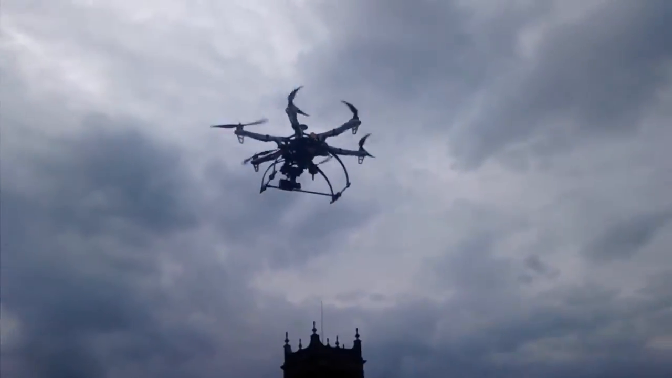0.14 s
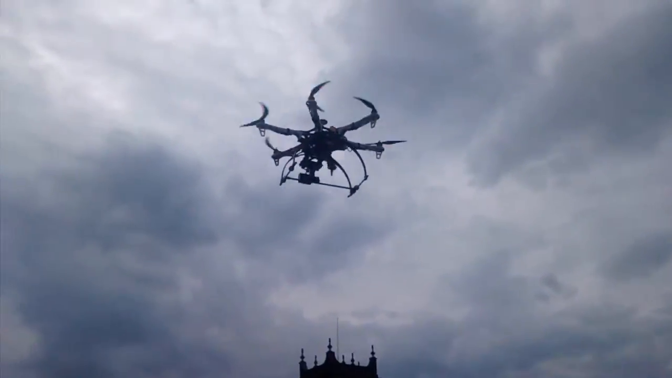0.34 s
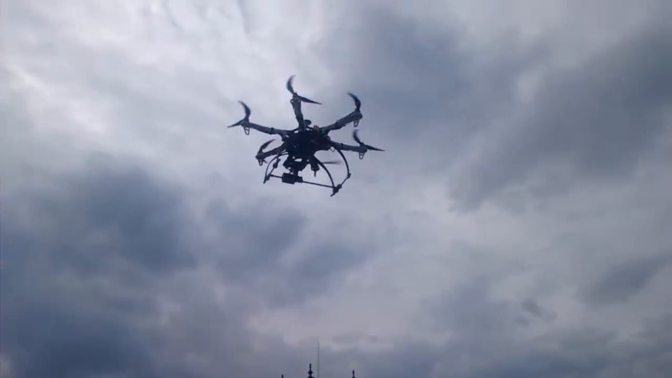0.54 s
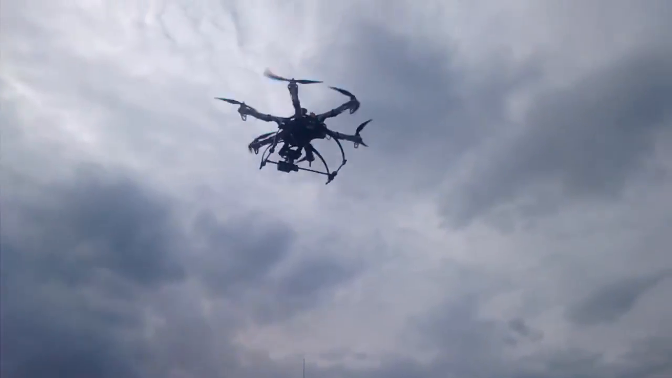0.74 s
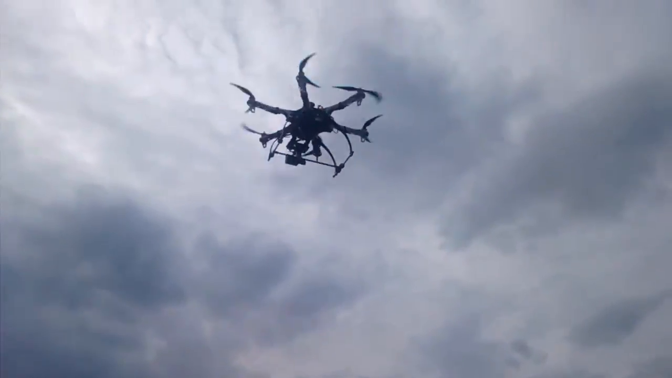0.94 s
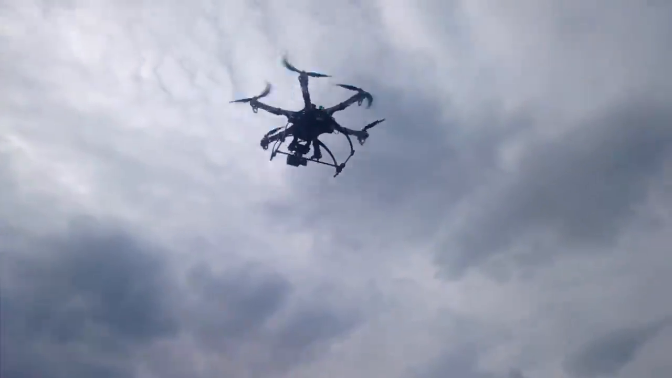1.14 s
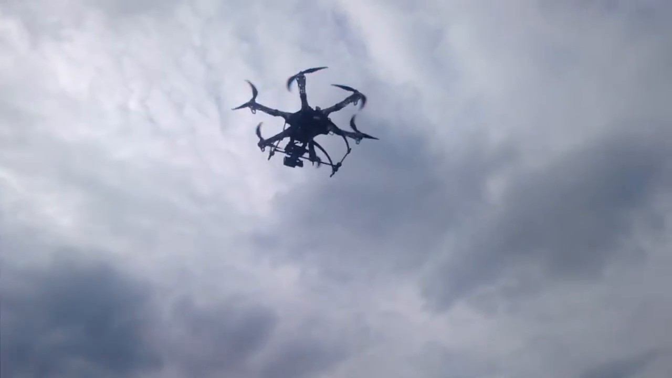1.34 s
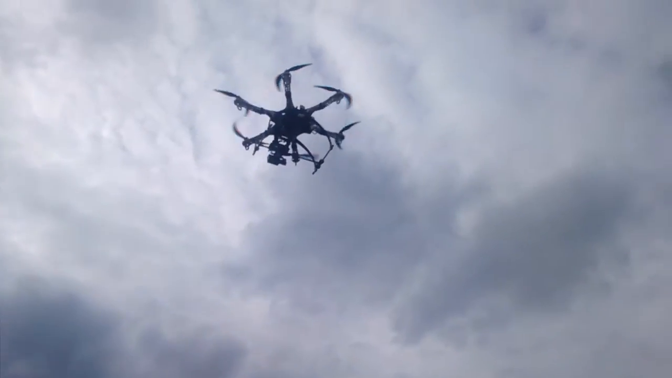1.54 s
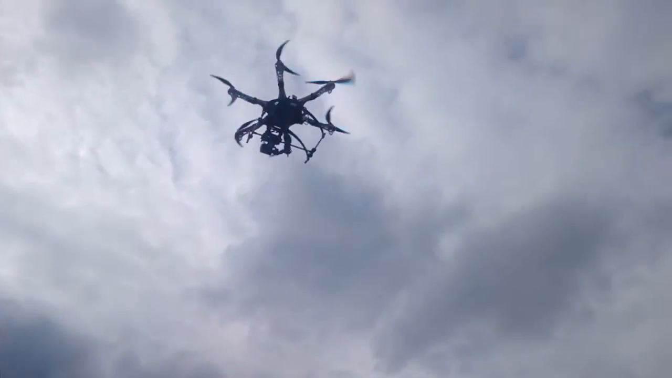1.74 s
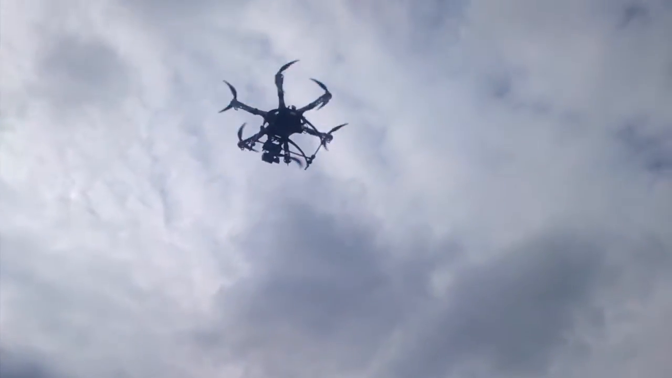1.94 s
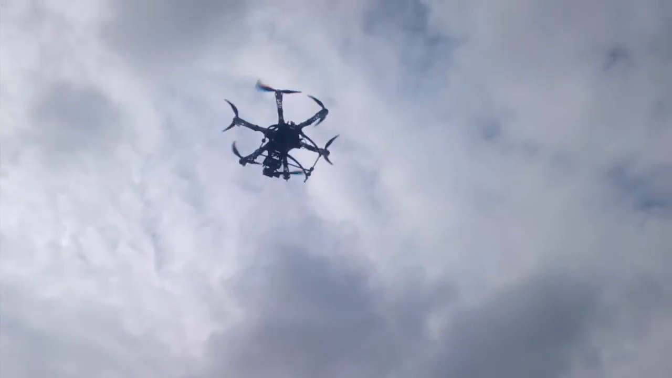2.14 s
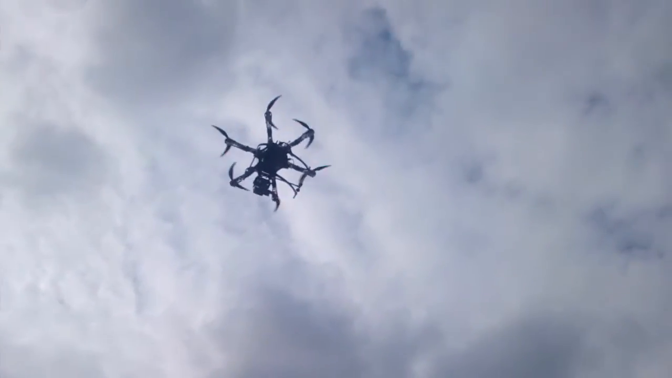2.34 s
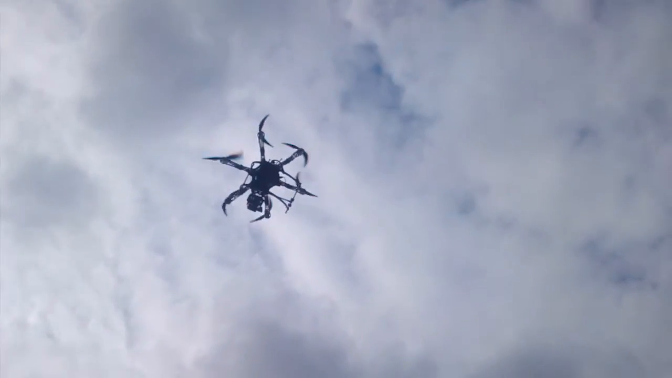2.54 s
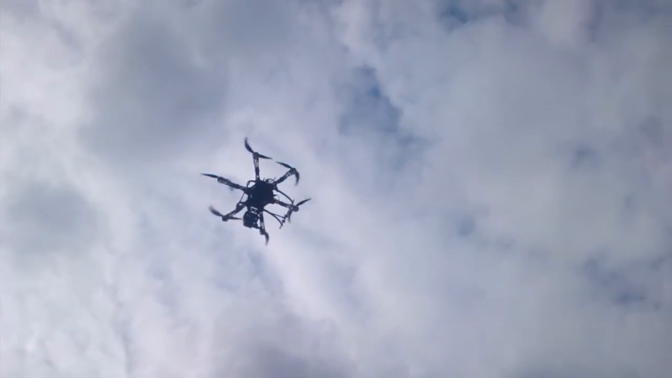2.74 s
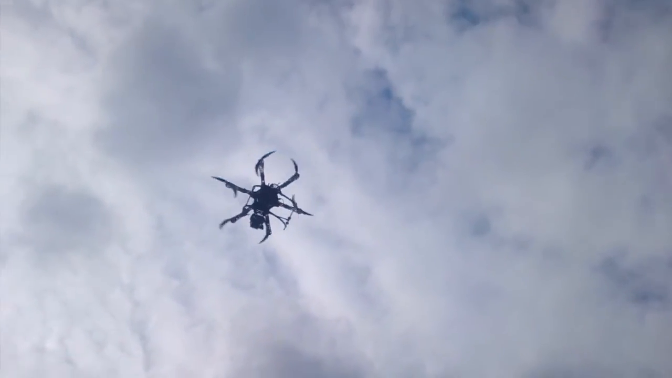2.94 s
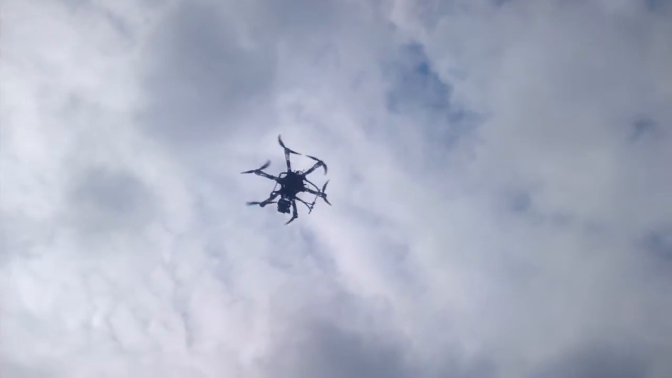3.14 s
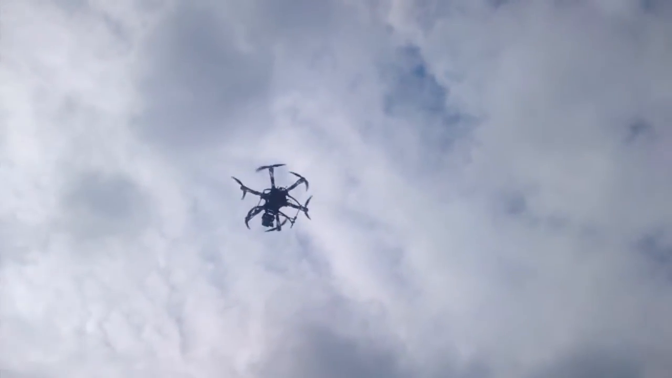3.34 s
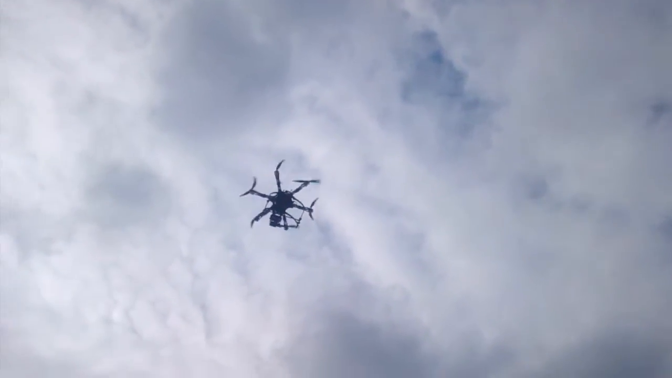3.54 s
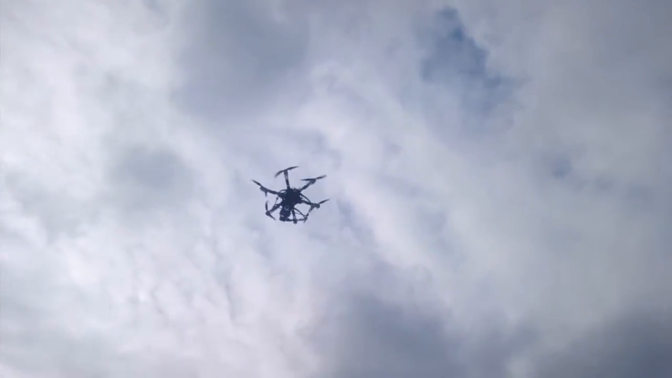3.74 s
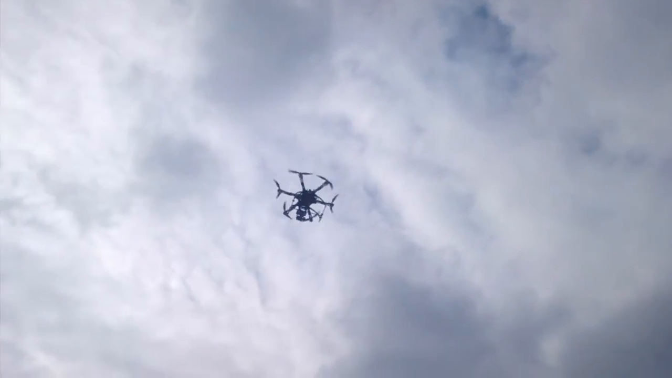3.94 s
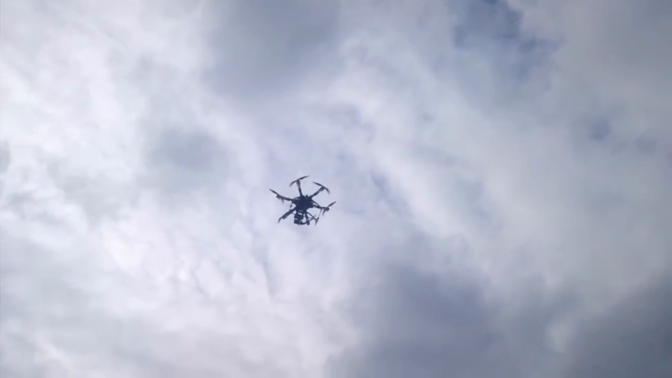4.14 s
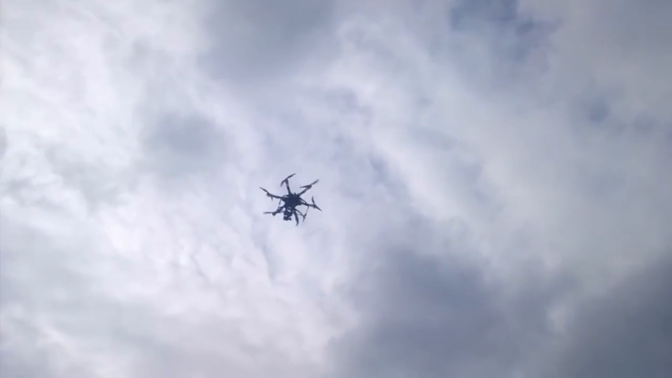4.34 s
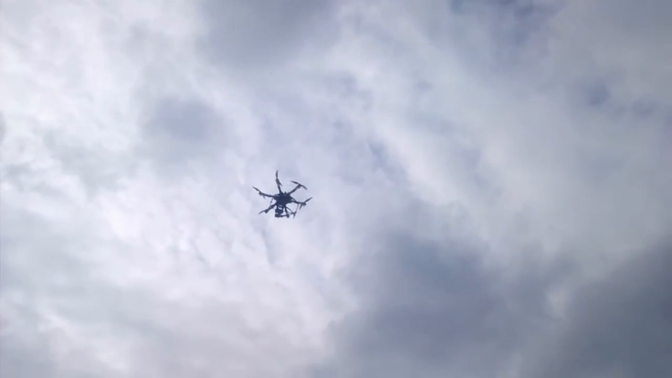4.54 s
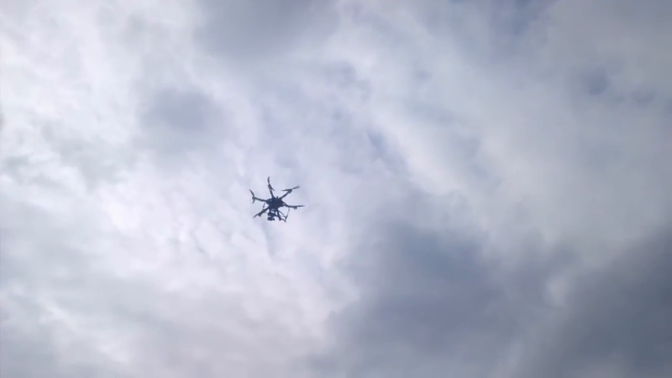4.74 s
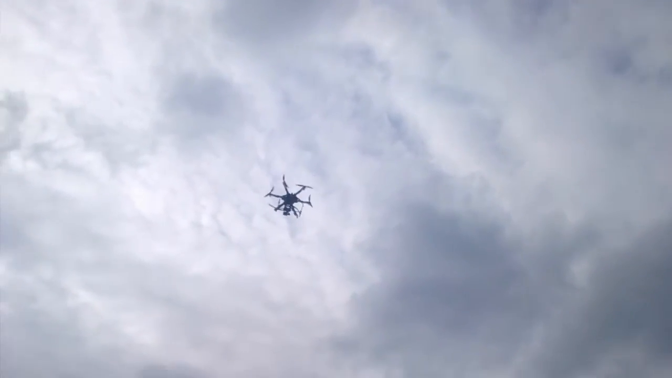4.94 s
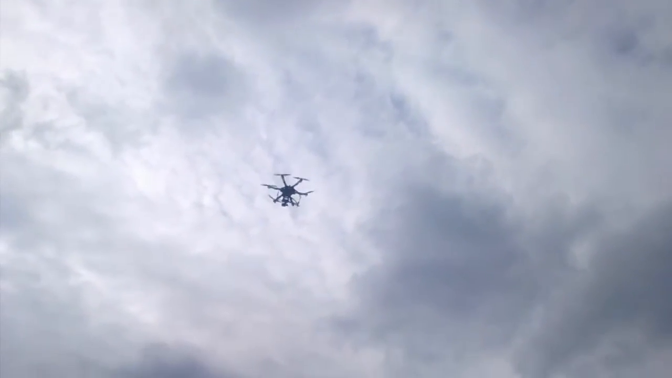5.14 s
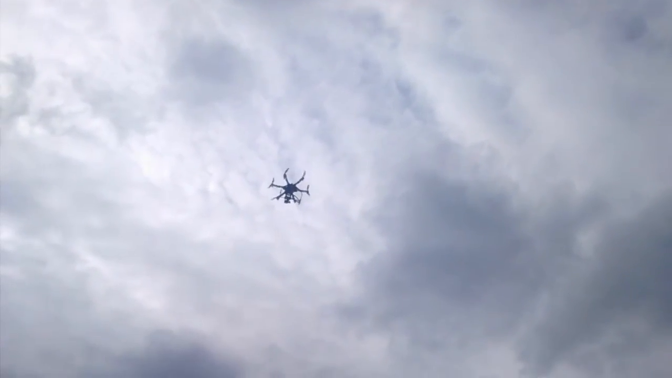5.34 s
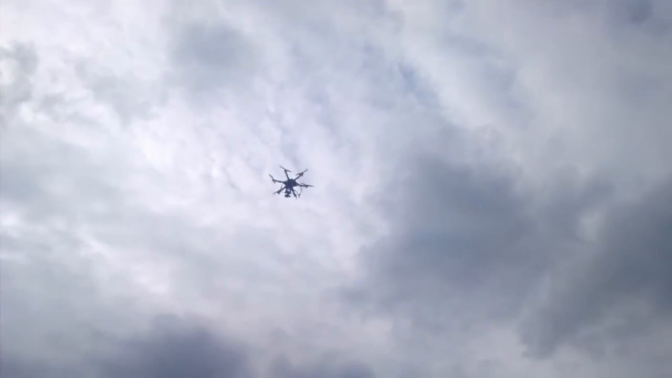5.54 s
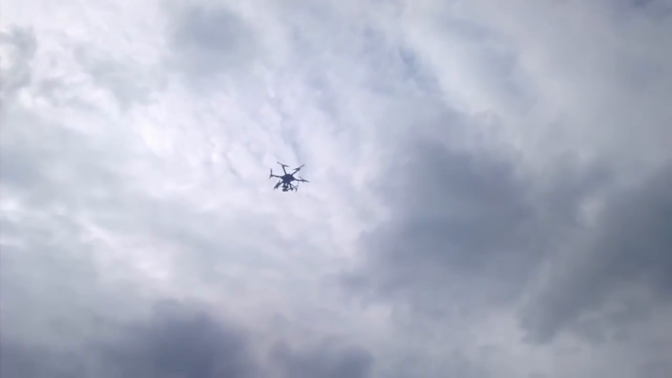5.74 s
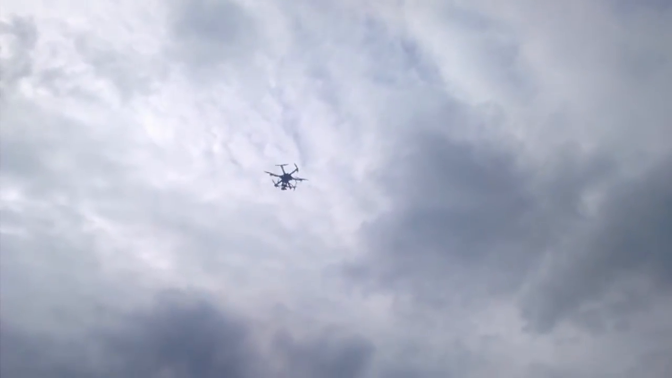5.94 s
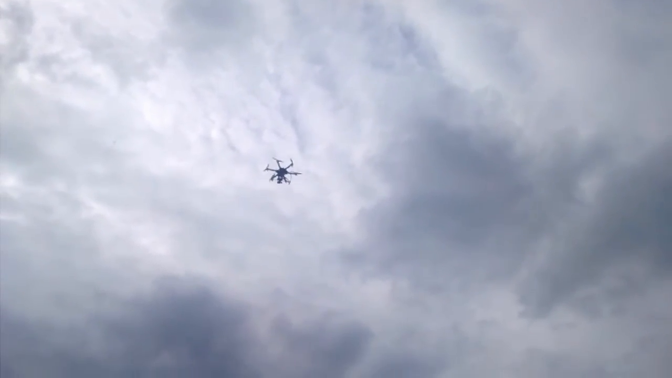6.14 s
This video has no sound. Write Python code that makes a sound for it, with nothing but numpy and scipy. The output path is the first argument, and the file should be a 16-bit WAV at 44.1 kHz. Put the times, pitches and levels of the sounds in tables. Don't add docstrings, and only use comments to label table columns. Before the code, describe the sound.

Loud electric rotors whir overhead from the start, slightly detuned against each other so the low hum throbs and wavers beneath a bright gritty hiss. A faint piercing motor whistle sits on top, and the recorder's case gets a soft tap. Past three seconds the craft recedes, swelling briefly near four, then becoming a thin distant buzz under wind bumps and faint town rumble. Open air, wide handheld stereo pickup.

```python
import sys
import numpy as np
from scipy import signal
from scipy.fft import rfft, irfft, next_fast_len
from scipy.io import wavfile
from scipy.ndimage import uniform_filter1d

SR = 44100
rng = np.random.default_rng(int(sys.argv[2]) if len(sys.argv) > 2 else 0)


def voltage_ratio(level):
    return 10 ** (np.asarray(level, float) / 20)


def store_wav(level_fs):
    pcm = np.round(np.clip(np.atleast_2d(level_fs), -1, 1) * 32767)
    wavfile.write(sys.argv[1], SR, pcm.T.astype(np.int16))


N = 277328
STEP = 40
PADDED = next_fast_len(N + 8192)
HZ = np.maximum(np.arange(PADDED // 2 + 1) * SR / PADDED, 1)


def rms_one(x):
    return x / np.sqrt(np.mean(x ** 2) + 1e-20)


def in_time(rows):
    s, *columns = np.transpose(rows)
    return np.array([np.interp(np.arange(N) / SR, s, c) for c in columns])


def fine(coarse):
    return np.array([np.interp(np.arange(N) / STEP, np.arange(len(v)), v) for v in coarse])


def slow_chance(rate, count=1):
    r = np.exp(-2 * np.pi * STEP * rate / SR)
    warm_up = 2000
    noise = rng.standard_normal((count, len(range(0, N, STEP)) + warm_up))
    slow = signal.lfilter([1], [1, -2 * r, r * r], noise)[:, warm_up:]
    return slow / np.sqrt(np.mean(slow ** 2, axis=1, keepdims=True))


def drift(rate, count=1):
    return fine(slow_chance(rate, count=count))


def bumps(rows, width_s):
    t = np.arange(N) / SR
    return sum(db * np.exp(-.5 * ((t - s) / width_s) ** 2) for s, db in rows)


def colour(points, axis=1):
    table = np.array(points)
    db = np.interp(np.log(HZ), np.log(table[:, 0]), table[:, axis])
    cepstrum = irfft(np.log(voltage_ratio(db)), PADDED)
    cepstrum[1:PADDED // 2] *= 2
    cepstrum[PADDED // 2 + 1:] = 0
    return np.exp(rfft(cepstrum))


def through(x, response):
    return irfft(rfft(x, PADDED) * response, PADDED)[..., :N]


def passing(x, order, hz, kind="low"):
    return signal.sosfilt(signal.butter(order, hz, kind, fs=SR, output="sos"), x)


def town_and_wind(lone_db):
    # f/Hz, right level/dB per Hz, left-only level/dB per Hz
    floor_spectrum = [(25, -65.5, -72), (56, -54.5, -77.5), (121, -70, -93.5), (284, -77, -88.5),
                      (750, -78, -79), (1530, -95, -86), (1750, -82.5, -98.5), (4160, -81, -91),
                      (6800, -83, -89), (10700, -102, -100), (14900, -105, -104)]
    # t/s, rise/dB
    gusts = [(0, 6), (.25, 1), (.75, 1), (1.05, 2), (1.42, 4), (1.85, 4), (3.65, 4), (3.83, 6), (4.1, 1),
             (4.62, 5), (5.08, 5.5), (5.35, 3), (6, 8.5), (6.27, 5)]
    wind_db = -42 + bumps(gusts, .07)
    responses = np.array([colour(floor_spectrum), colour(floor_spectrum, axis=2)])
    floor = np.sqrt(SR / 2) * through(rng.standard_normal((2, N)), responses)
    bass = passing(floor, 2, 130)
    floor += bass * (voltage_ratio(wind_db + 41 + 0.89 * drift(4.4)) - 1)
    floor[1] += passing(floor[1], 2, 250) * (voltage_ratio(lone_db) - 1)
    return floor


def recorder_tap():
    # t/s, peak level/dB
    taps = [
        (1.26, -15),
    ]
    out = np.zeros(N)
    after = np.arange(600) / SR
    for s, db in taps:
        out[round(s * SR):][:600] += voltage_ratio(db) * np.exp(-after / 0.0012) * np.sin(2 * np.pi * 420 * after)
    return out


def rotor_turns():
    # t/s, f/Hz
    slow_trio = [
        [(0.0, 175.0), (0.3, 175.0), (0.7, 176.2), (1.0, 178.7), (1.2, 182.5), (1.55, 179.4), (1.8, 183.2),
         (2.0, 182.3), (2.17, 184.5), (2.5, 178.2), (2.75, 179.5), (3.12, 182.9), (3.3, 186.1), (3.6, 182.9),
         (3.95, 179.4), (4.15, 176.2), (4.75, 180.0), (6.3, 180.0)],
        [(0.0, 179.0), (0.35, 183.3), (0.5, 182.5), (0.82, 185.6), (1.0, 189.1), (1.25, 186.6), (1.55, 185.4),
         (1.8, 188.3), (1.95, 191.7), (2.15, 187.1), (2.27, 183.6), (2.45, 186.8), (2.85, 186.2), (3.15, 184.5),
         (3.7, 186.3), (4.5, 186.9), (5.1, 191.0), (6.3, 189.0)],
        [(0.0, 179.7), (0.6, 184.1), (1.35, 187.3), (1.55, 185.1), (2.0, 192.0), (2.2, 187.3), (2.37, 189.0),
         (2.6, 186.2), (2.9, 186.1), (3.2, 189.2), (3.4, 185.8), (4.15, 190.0), (4.5, 186.4), (5.05, 192.5),
         (5.4, 190.5), (5.6, 191.5), (5.9, 188.0), (6.3, 190.0)],
    ]
    # t/s, f/Hz
    fast_trio = [
        [(0.0, 202.9), (0.6, 206.0), (0.95, 202.3), (1.2, 201.7), (1.32, 204.2), (1.6, 202.4), (1.8, 200.1),
         (1.9, 202.0), (2.0, 198.8), (2.13, 199.6), (2.27, 196.5), (2.4, 198.3), (2.55, 195.5), (2.87, 200.3),
         (3.15, 198.3), (3.3, 200.1), (3.42, 200.7), (3.5, 200.1), (3.6, 201.0), (3.8, 202.0), (3.92, 203.9),
         (4.12, 207.9), (4.4, 204.0), (5.05, 200.0), (5.95, 209.0), (6.3, 205.0)],
        [(0.0, 195.4), (0.3, 199.8), (0.45, 198.8), (0.6, 200.0), (0.8, 197.7), (1.2, 211.6), (1.55, 208.7),
         (1.7, 210.5), (2.05, 204.6), (2.15, 209.7), (2.45, 200.3), (2.6, 203.3), (2.8, 203.2), (2.9, 205.3),
         (3.0, 206.1), (3.2, 208.6), (3.3, 208.3), (3.6, 201.8), (4.3, 204.2), (4.8, 205.0), (5.3, 201.0),
         (6.3, 206.0)],
        [(0.0, 201.1), (0.35, 208.3), (0.6, 207.6), (0.85, 208.2), (1.12, 214.4), (1.35, 212.9), (1.7, 214.0),
         (1.95, 211.3), (2.45, 203.8), (3.25, 207.9), (3.9, 215.2), (4.6, 215.0), (4.95, 219.0), (5.05, 222.0),
         (5.35, 215.0), (5.7, 220.0), (5.9, 218.0), (6.2, 225.0), (6.3, 224.0)],
    ]
    speed = np.vstack([in_time(rows) for rows in slow_trio + fast_trio])
    far = np.clip(np.arange(N) / SR - 3.8, 0, 1)
    speed += (0.25 + 0.5 * far) * drift(12.44, count=6)
    return np.cumsum(speed, axis=1) / SR


def swelling(near_db):
    # t/s, rise/dB
    swells = [
        (4.11, 8.5),
        (4.25, 3.5),
        (4.35, 4.5),
        (5.12, 1.5),
    ]
    return near_db + bumps(swells, 0.034) + 0.46 * drift(4.6)[0]


def slap_strength():
    # t/s, level/dB of each of the 6 rotors
    slap_levels = [(0.0, -28.0, -13.0, -15.0, -15.0, -22.0, -11.0),
                   (0.25, -26.0, -14.0, -17.0, -15.0, -19.0, -17.0),
                   (0.55, -18.0, -16.0, -18.0, -18.0, -10.0, -27.0),
                   (0.85, -15.0, -16.0, -14.0, -24.0, -15.0, -11.0),
                   (1.15, -18.0, -15.0, -20.0, -15.0, -24.0, -11.0),
                   (1.45, -14.0, -23.0, -21.0, -12.0, -21.0, -17.0),
                   (1.75, -16.0, -14.0, -22.0, -12.0, -14.0, -19.0),
                   (2.05, -15.0, -21.0, -26.0, -16.0, -16.0, -18.0),
                   (2.3, -17.0, -23.0, -25.0, -12.0, -17.0, -25.0),
                   (2.55, -14.0, -16.0, -16.0, -10.0, -22.0, -24.0),
                   (2.8, -13.0, -15.0, -16.0, -13.0, -15.0, -25.0),
                   (3.05, -24.0, -16.0, -17.0, -10.0, -18.0, -24.0),
                   (3.25, -13.0, -17.0, -18.0, -8.0, -26.0, -24.0),
                   (3.55, -17.0, -31.0, -25.0, -7.0, -26.0, -27.0),
                   (3.85, -17.0, -31.0, -24.0, -7.0, -20.0, -23.0),
                   (3.97, -19.0, -27.0, -25.0, -17.0, -16.0, -24.0),
                   (4.15, -22.0, -23.0, -21.0, -14.0, -26.0, -28.0),
                   (4.38, -22.0, -22.0, -27.0, -12.0, -18.0, -24.0),
                   (4.5, -22.0, -24.0, -27.0, -21.0, -21.0, -23.0),
                   (4.75, -20.0, -27.0, -27.0, -24.0, -20.0, -21.0),
                   (5.1, -20.0, -19.0, -20.0, -27.0, -21.0, -18.0),
                   (5.5, -26.0, -27.0, -23.0, -21.0, -20.0, -23.0),
                   (5.9, -23.0, -26.0, -26.0, -21.0, -21.0, -20.0),
                   (6.28, -22.0, -23.0, -26.0, -18.0, -22.0, -11.0)]
    slap_trim = [
        [0.3],
        [-0.7],
        [-3],
        [0.6],
        [-2.5],
        [-0.6],
    ]
    return in_time(slap_levels) + slap_trim


def whistle(turns):
    # t/s, f/Hz
    clock = [(0, 8064), (1.2, 8058), (3, 8030), (4.5, 8014), (6.3, 8000)]
    # t/s, level/dB
    whistle_levels = [(0, -40), (.5, -32.5), (1.2, -35), (1.9, -43), (2.9, -45), (3.2, -50), (4, -44.5),
                      (5, -54), (6.3, -59)]
    driver_offsets = [-16, -7, 0, 5, 19, 27]
    (hz,), (db,) = in_time(clock), in_time(whistle_levels)
    clock_hz = hz + np.array(driver_offsets)[:, None] + 1.5 * drift(3, count=6)
    cycles = np.cumsum(clock_hz, axis=1) / SR
    swing = 1 + .12 * np.cos(2 * np.pi * turns)
    strength_db = np.array([[-10], [-4], [2], [-6], [-12], [-6]]) + 2.5 * drift(3, count=6)
    return voltage_ratio(db - 7.0 + strength_db) * swing * np.sin(2 * np.pi * cycles)


def blade_hiss(turns, slap_db):
    sharp, patchy_db = 0.8, 2
    sweep = np.exp(sharp * np.cos(2 * np.pi * turns))
    gate = sweep * fine(voltage_ratio(.5 * slap_db[:, ::STEP] + patchy_db * slow_chance(10, count=6)))
    return rng.standard_normal((2, N)) * rms_one(np.sqrt(np.sum(gate, axis=0)))


def blade_slaps(turns, slap_db):
    jitter_s, uneven_db, scatter_s = .000012, 1.5, .003
    out = np.zeros((6, N + 2))
    for k in range(6):
        at = np.interp(np.arange(1, int(turns[k, -1])), turns[k], np.arange(N))
        chance = rng.standard_normal((len(at), 2))
        at = np.clip(at + jitter_s * SR * chance[:, 0], 0, N)
        whole, part = at.astype(int), at % 1
        size = voltage_ratio(slap_db[k, np.minimum(whole, N - 1)] + 42 + uneven_db * chance[:, 1])
        np.add.at(out[k], whole, size * (1 - part))
        np.add.at(out[k], whole + 1, size * part)
    step = out[:, :N]
    fade = np.exp(-np.arange(500) / SR / scatter_s)
    rattles = .06 * rng.standard_normal((2, 6, 500)) * fade
    aspect = 1.5 * drift(1.5, count=6)
    scattered = step.copy()
    for lean, rattle in zip([np.cos(aspect), np.sin(aspect)], rattles):
        scattered += signal.oaconvolve(step * lean, rattle, axes=1)[:, :N]
    crisp = signal.lfilter([1.3, -.4], [1], scattered)
    return passing(crisp, 6, 660, "high")


def wake_tones(turns, level_db):
    # t/s, middle orders against the hiss/dB
    facing = [(0, -7.5), (.8, -.5), (1.1, 1), (2.2, 2), (2.6, -2), (2.9, -2.5), (3.4, -4.5), (3.85, -5.5),
              (4.2, -2), (5, -2.5), (5.7, 1), (6.3, -6)]
    # t/s, centre f/Hz, lift/dB
    echo_peak = [(0, 1750, 1), (.5, 1600, 4), (1.15, 1280, 3), (1.6, 1480, 5), (2.05, 1420, 5),
                 (2.4, 1010, 5), (3, 1020, 6), (3.6, 1000, 6), (4.3, 1000, 3), (6.3, 1000, 0)]
    upper_orders = [-9, -4.5, -8.5, -5.5, -7, -8]
    level_db = (level_db + in_time(facing))[:, ::STEP]
    speed = np.gradient(turns[:, ::STEP], axis=1) * SR / STEP
    centre_hz, lift_db = in_time(echo_peak)[:, ::STEP]
    out = np.zeros((6, N))
    for order, db in enumerate(upper_orders, 4):
        echo_db = lift_db / (1 + ((order * speed - centre_hz) / 100) ** 2)
        size = fine(voltage_ratio(level_db + db + echo_db + 2.2 * slow_chance(2.5, count=6)))
        out += size * np.sin(2 * np.pi * (order * turns + rng.random((6, 1))))
    return out


def thrust_tones(turns, near_db):
    # t/s, level/dB of each of the 6 rotors
    hum = [(0.0, -34.0, -38.0, -39.0, -40.0, -42.0, -39.0),
           (0.25, -35.0, -35.0, -35.0, -42.0, -45.0, -42.0),
           (0.55, -31.0, -33.0, -33.0, -44.0, -39.0, -42.0),
           (0.85, -28.0, -30.0, -31.0, -41.0, -40.0, -44.0),
           (1.15, -28.0, -32.0, -31.0, -57.0, -39.0, -38.0),
           (1.45, -29.0, -28.0, -28.0, -42.0, -42.0, -39.0),
           (1.75, -28.0, -31.0, -31.0, -38.0, -38.0, -42.0),
           (2.05, -31.0, -32.0, -32.0, -35.0, -36.0, -42.0),
           (2.3, -30.0, -31.0, -35.0, -33.0, -32.0, -35.0),
           (2.55, -30.0, -28.0, -29.0, -32.0, -32.0, -34.0),
           (2.8, -29.0, -32.0, -32.0, -33.0, -31.0, -33.0),
           (3.05, -31.0, -31.0, -34.0, -34.0, -33.0, -33.0),
           (3.25, -33.0, -34.0, -34.0, -34.0, -40.0, -40.0),
           (3.55, -33.0, -35.0, -36.0, -38.0, -43.0, -47.0),
           (3.85, -40.0, -53.0, -48.0, -38.0, -38.0, -55.0),
           (3.97, -44.0, -51.0, -53.0, -40.0, -43.0, -54.0),
           (4.15, -45.0, -53.0, -53.0, -42.0, -49.0, -61.0),
           (4.4, -45.0, -48.0, -48.0, -42.0, -43.0, -54.0),
           (4.75, -46.0, -49.0, -49.0, -51.0, -44.0, -58.0),
           (5.1, -53.0, -48.0, -50.0, -54.0, -50.0, -66.0), (5.5, -50.0, -49.0, -48.0, -49.0, -52.0, -65.0),
           (5.9, -50.0, -51.0, -51.0, -56.0, -62.0, -72.0),
           (6.28, -52.0, -55.0, -53.0, -48.0, -48.0, -61.0)]
    # t/s, level/dB of each of the 6 rotors
    third_order = [(0, -11, -7, -7, -3, -9, -9), (.5, -14, -10, -10, 7, 1, 1), (1, -14, -10, -10, 13, 7, 7),
                   (1.5, -12, -7, -7, 10, 4, 6), (2, -9, -4, -4, 2, -2, 0),
                   (2.5, -15, -10, -10, -4, -8, -8), (3, -14, -8, -8, 2, -4, -4),
                   (3.6, -16, -10, -10, 3, -3, 0), (4.1, -14, -6, -6, 2, -3, 4),
                   (4.5, -17, -11, -11, -5, -7, 6), (5.1, -17, -11, -11, 0, -4, 18),
                   (5.5, -18, -14, -14, -2, -4, 12), (6.3, -17, -13, -13, -2, -4, 14)]
    first_db = [-42.5, -42.5, -42.5, -39, -45, -46]
    first_follows = [0.58, 0.055]
    second, third = in_time(hum)[:, ::STEP] - 2.5, in_time(third_order)[:, ::STEP]
    near_db = near_db[::STEP]
    out = np.zeros((6, N))
    for k in range(6):
        level_of = {
            1: first_db[k] + first_follows[k // 3] * (near_db - near_db.max()),
            2: second[k],
            3: second[k] + third[k],
            1.5: second[k] - 20,
            4: second[k] + np.minimum(third[k], 3) - 9,
            2.5: second[k] - 21,
        }
        flutter_db = 2.2 * slow_chance(5, count=6)
        sizes = fine(np.sqrt(2) * voltage_ratio(np.array(list(level_of.values())) + flutter_db))
        for order, size in zip(level_of, sizes):
            out[k] += size * np.sin(2 * np.pi * (order * turns[k] + rng.random()))
    return out


def frame_ring(x):
    # t/s, level/dB
    body = [(0, -2), (.5, 0), (1.3, 1), (2.3, 2.5), (2.9, .5), (3.3, -3), (4.2, -3.5), (5, -1), (6.3, -1)]
    body_band = [3000, 3750]
    band = signal.butter(2, body_band, "band", fs=SR, output="sos")
    return x + (voltage_ratio(in_time(body)[0]) - 1) * signal.sosfiltfilt(band, x)


def tip_beam(x):
    # t/s, level/dB
    edge_levels = [(0, 1), (.6, 2.5), (1, 0), (1.5, 0), (2.4, 0), (2.9, 0), (3.1, -2), (3.5, -1), (3.8, -2),
                   (4.2, 0), (5, 0), (6.3, 0)]
    treble = signal.sosfiltfilt(signal.butter(2, 4500, "high", fs=SR, output="sos"), x)
    return x + (voltage_ratio(in_time(edge_levels)[0]) - 1) * treble


def right_port(tones, slaps, hiss, pwm, scale):
    # f/Hz, level/dB per Hz
    rotor_spectrum = [(60, -25), (280, -14), (480, -20), (650, -15), (760, -10), (1000, -10.5), (1500, -10),
                      (2000, -0.5), (2400, -5.5), (2900, -1), (3350, 5.5), (4000, -2), (6500, -3),
                      (7500, -17.5), (9000, -27.5), (11000, -36), (15000, -74.5)]
    noise = scale * (voltage_ratio(4) * hiss + slaps.sum(0))
    right = tones.sum(0) + through(noise, colour(rotor_spectrum))
    return tip_beam(frame_ring(right)) + voltage_ratio(-5.0) * pwm.sum(0)


def left_only(tones, slaps, hiss, pwm, scale):
    # f/Hz, level/dB per Hz
    left_spectrum = [(60, -32), (280, -19), (480, -19), (700, -11), (1100, -9), (1600, -2.5), (2150, -6.5),
                     (2550, -4), (3200, -8.5), (4000, -3.5), (6500, -17), (7450, -16), (8200, -20),
                     (9500, -13.5), (11000, -17), (13000, -14), (15000, -17.5)]
    # t/s, level/dB
    side_treble = [(0, -24), (1, -15.5), (3, -14.5), (4.4, -17.5), (5.1, -19), (5.6, -14), (6.3, -18)]
    # t/s, share
    left_hum = [(0, 0.35), (.5, 0.9), (1.2, 1.3), (1.9, 1.1), (2.3, 0.2), (2.6, 0.02), (3.2, 0.05),
                (4.2, 0.15), (6.3, 0.1)]
    lags, signs = rng.integers(60, 200, 6), np.array([1, -1, 1, -1, 1, -1])

    def aside(rotors):
        return sum(sign * np.roll(row, lag) for row, lag, sign in zip(rotors, lags, signs))

    soft_slaps = signal.lfilter([0.6], [1, -0.4], aside(slaps))
    noise = scale * (voltage_ratio(5) * hiss + voltage_ratio(-1.0) * soft_slaps)
    own = tip_beam(through(noise, colour(left_spectrum)))
    (tilt_db,) = in_time(side_treble)
    own += passing(own, 4, 8500, "high") * (voltage_ratio(tilt_db - tilt_db.mean()) - 1)
    own += voltage_ratio(6.0) * aside(pwm)
    own += voltage_ratio(-16.0) * passing(aside(tones), 2, 750, "high")
    own += in_time(left_hum)[0] * passing(tones[3:].sum(0), 3, [320, 490], "band")
    return own


def port_mix():
    # upper null f/Hz, gain, phase/rad at lower null, phase/rad at upper null
    lobes = [(803, 1.08, 2.66, 3.63), (1877, 0.69, -1.06, -0.5), (2600, 0.86, 4, 3.5), (3280, 0.52, 3, 2),
             (5300, 0.21, 1.8, -1.5), (7690, 0.78, 2, 0), (8100, 2.64, 3, 4)]
    out = 2.18 * np.exp(2j * np.pi * (HZ - 8960) * 0.00032)
    low = -lobes[0][0]
    for high, gain, start, end in lobes:
        inside = (HZ >= low) & (HZ < high)
        part = (HZ[inside] - low) / (high - low)
        phase = start + (end - start) * part
        out[inside] = gain * np.sin(np.pi * part) ** 0.39 * np.exp(1j * phase)
        low = high
    return out


def scene():
    # t/s, level/dB
    nearness = [(0, -25.5), (.55, -23), (.9, -23), (1.3, -22), (1.5, -21), (2.25, -22), (2.4, -23),
                (2.9, -23), (3.15, -22.5), (3.3, -28), (3.88, -28.5), (3.92, -33), (4.5, -38),
                (4.75, -35.5), (5.3, -38), (5.55, -44.5), (5.85, -45.5), (6.15, -41.5)]
    # t/s, share of the right's bass added to the left,
    # wind heard by the left alone/dB
    bass_leak = [(0, -0.025, -4), (.8, -0.025, -5), (1.0, 0.045, 3), (2.3, 0.05, 2), (3, 0.06, 4),
                 (6.3, 0.06, 4)]
    turns = rotor_turns()
    (near_db,) = in_time(nearness)
    hiss_db, slap_db = swelling(near_db), slap_strength()
    tones = thrust_tones(turns, uniform_filter1d(near_db, SR // 4))
    tones += wake_tones(turns, hiss_db + slap_db)
    slaps, hiss, pwm = blade_slaps(turns, slap_db), blade_hiss(turns, slap_db), whistle(turns)
    scale = voltage_ratio(hiss_db - 4.5)
    leak, lone_db = in_time(bass_leak)
    floor = town_and_wind(lone_db)
    right = right_port(tones, slaps, hiss[0], pwm, scale) + recorder_tap() + floor[0]
    own = left_only(tones, slaps, hiss[1], pwm, scale)
    own += leak * passing(right, 2, 300)
    left = through(right, port_mix()) + own + floor[1]
    return np.array([left, right])


def roll_off(x):
    return signal.sosfilt(signal.butter(12, 15450, fs=SR, output="sos"), x)


def record(dry):
    return roll_off(dry)


dry = scene()
out = record(dry)
store_wav(out)
```